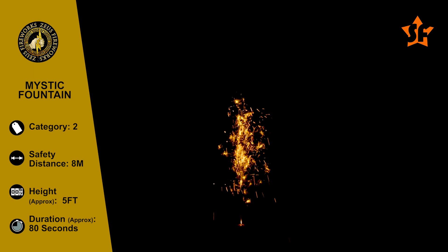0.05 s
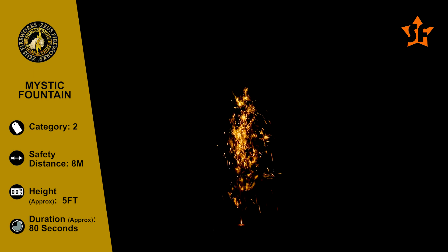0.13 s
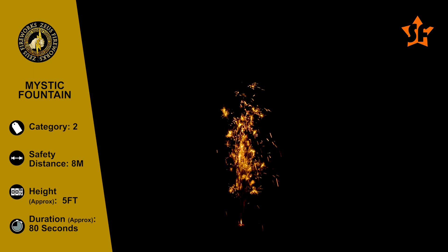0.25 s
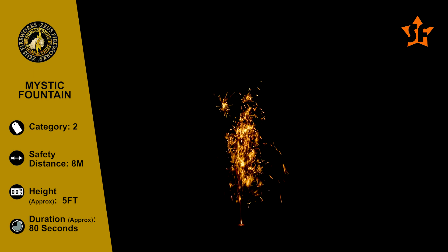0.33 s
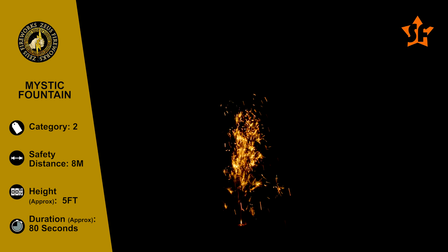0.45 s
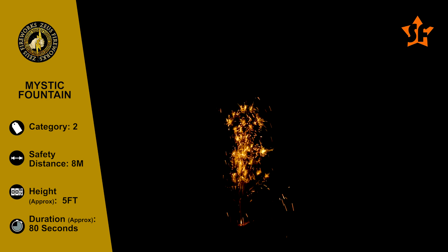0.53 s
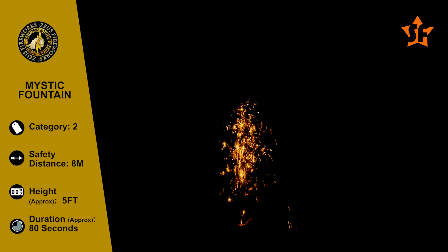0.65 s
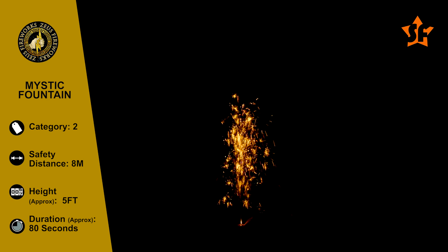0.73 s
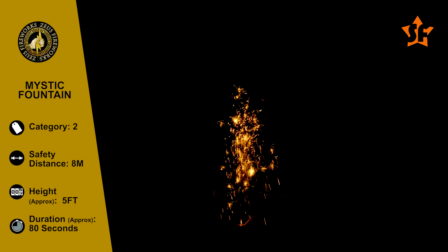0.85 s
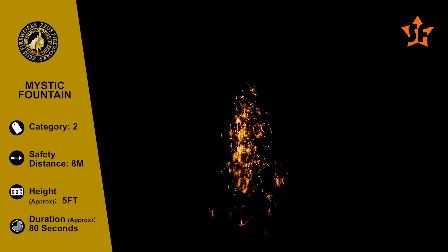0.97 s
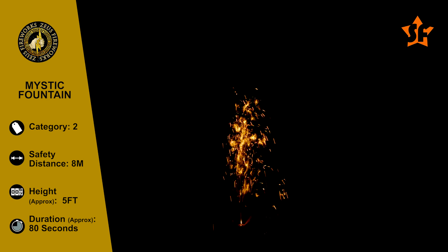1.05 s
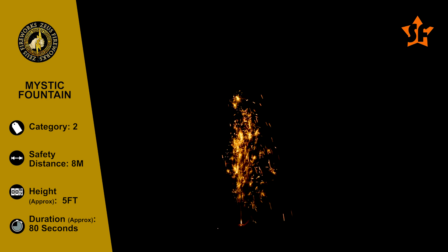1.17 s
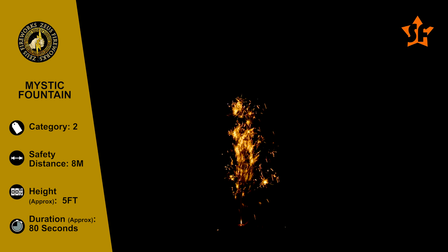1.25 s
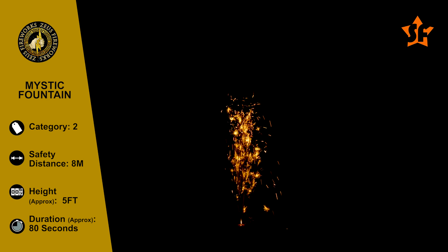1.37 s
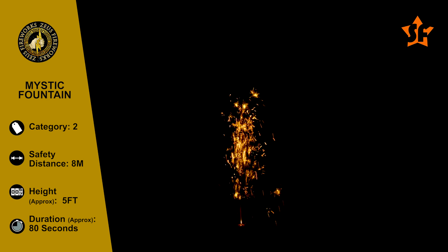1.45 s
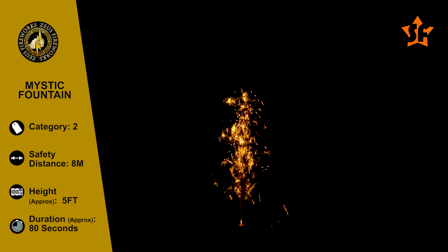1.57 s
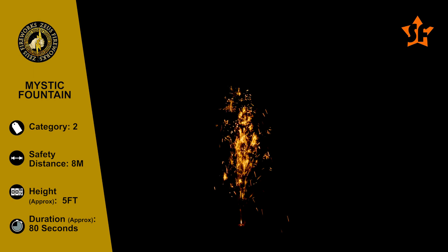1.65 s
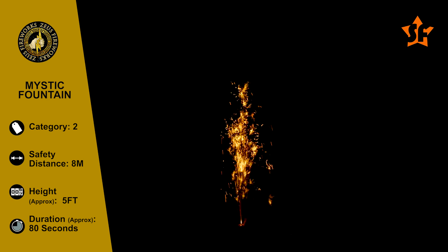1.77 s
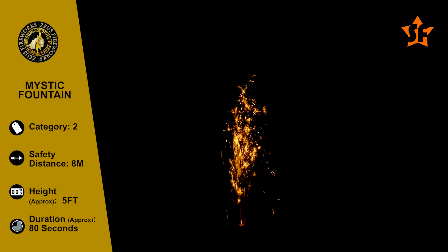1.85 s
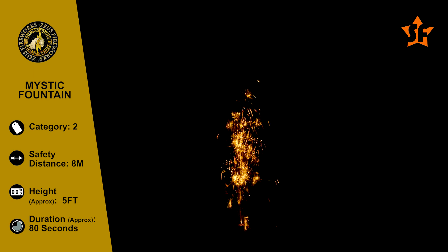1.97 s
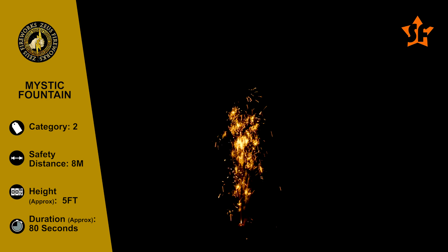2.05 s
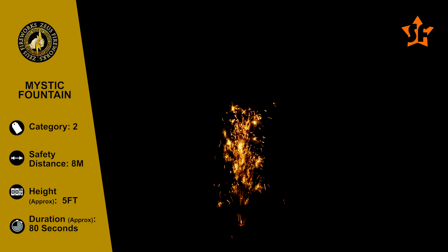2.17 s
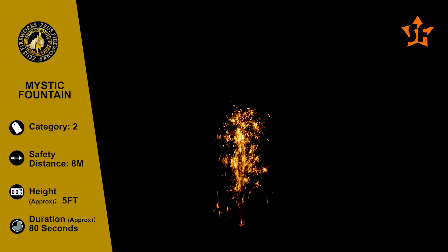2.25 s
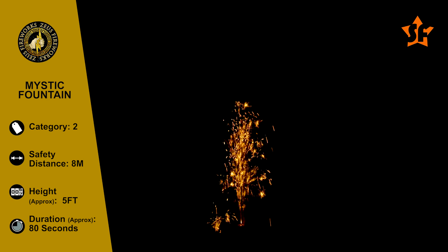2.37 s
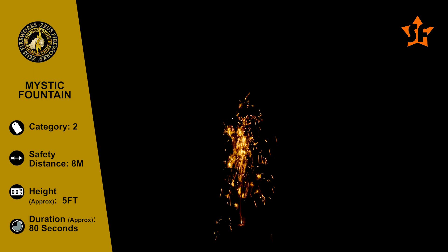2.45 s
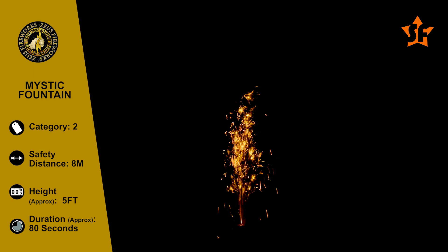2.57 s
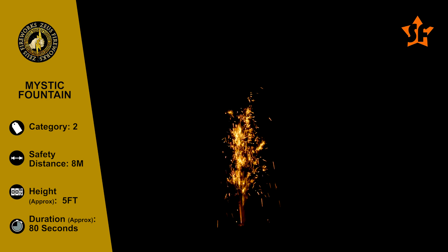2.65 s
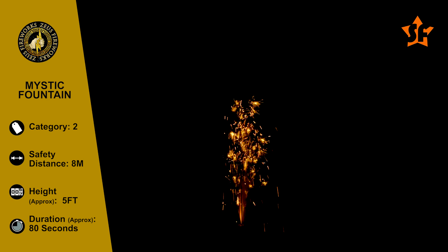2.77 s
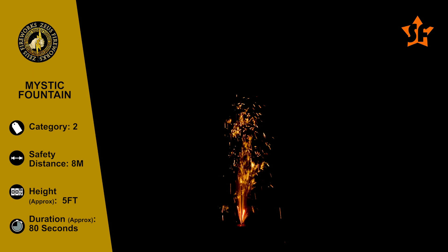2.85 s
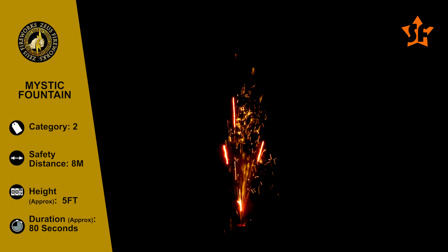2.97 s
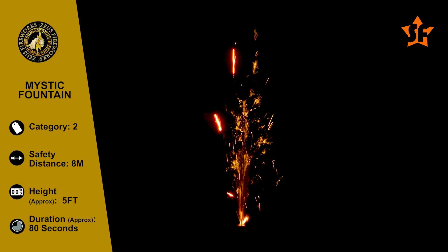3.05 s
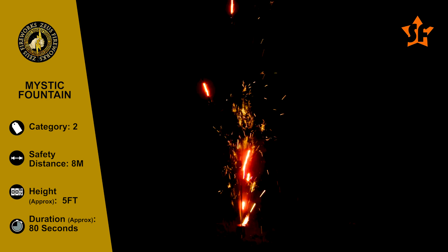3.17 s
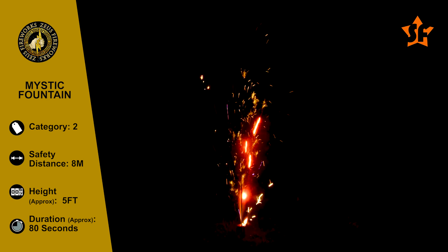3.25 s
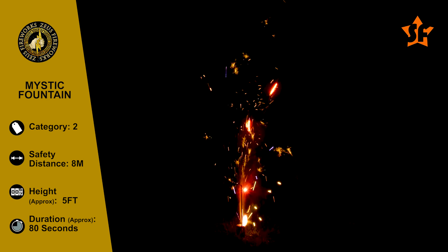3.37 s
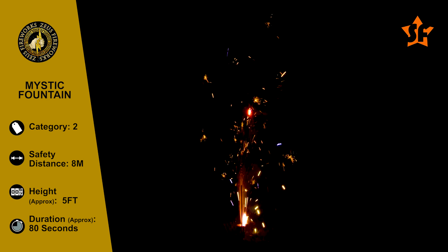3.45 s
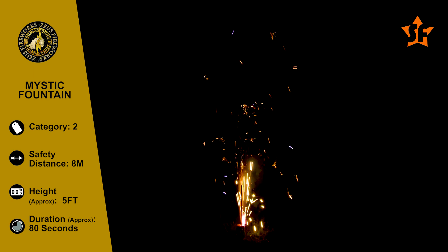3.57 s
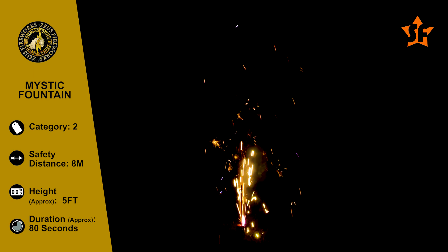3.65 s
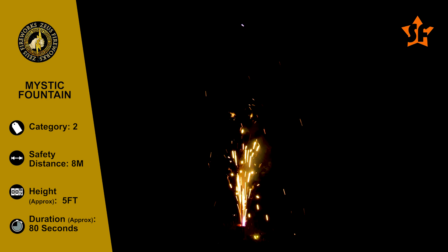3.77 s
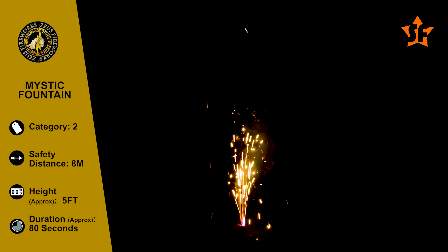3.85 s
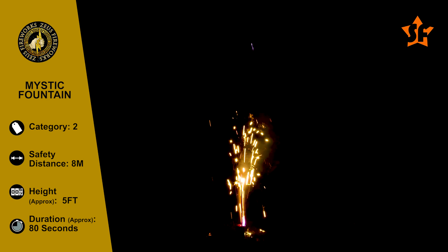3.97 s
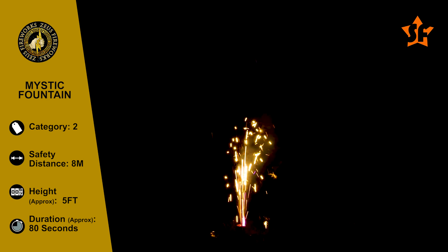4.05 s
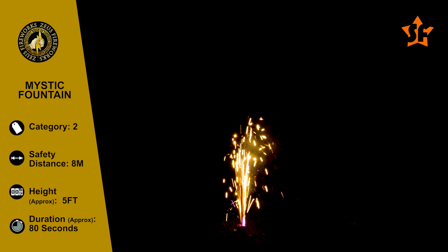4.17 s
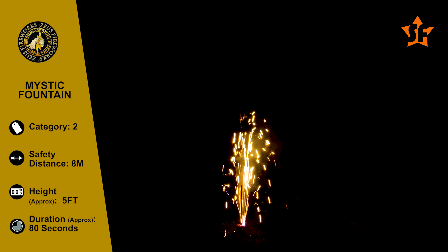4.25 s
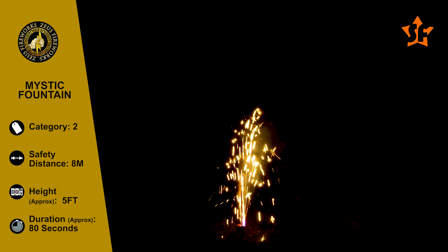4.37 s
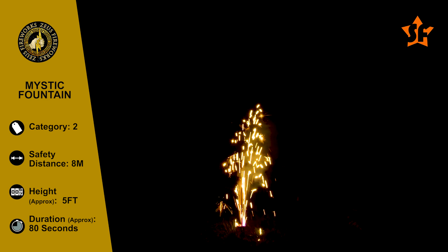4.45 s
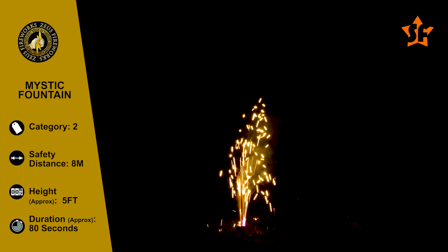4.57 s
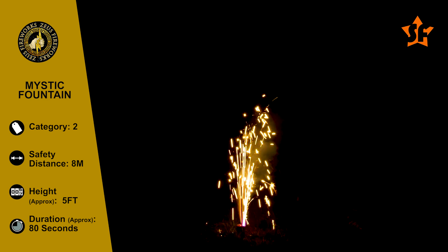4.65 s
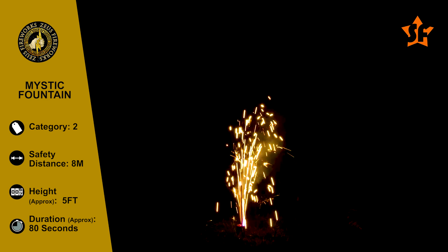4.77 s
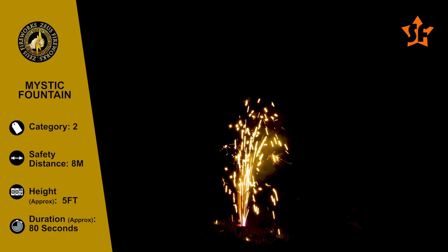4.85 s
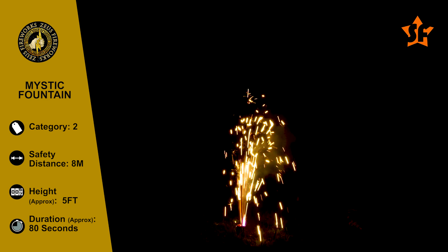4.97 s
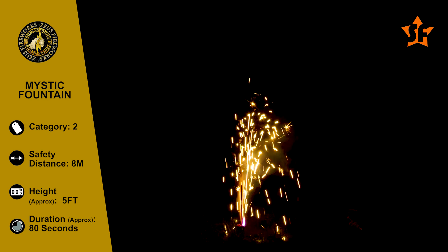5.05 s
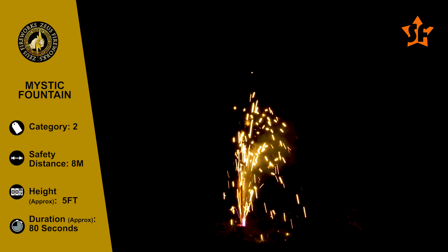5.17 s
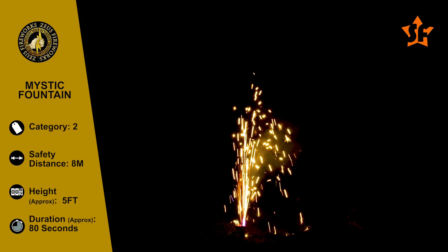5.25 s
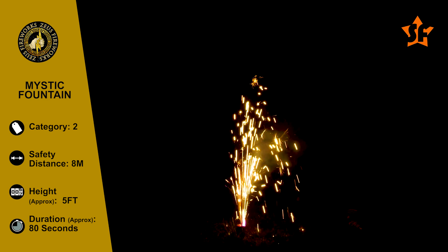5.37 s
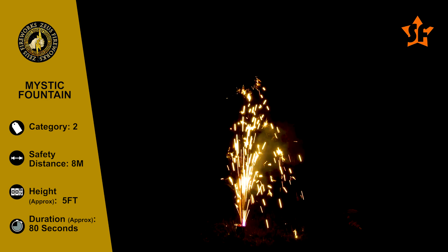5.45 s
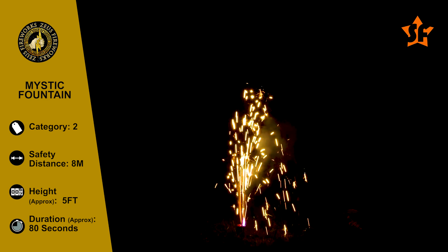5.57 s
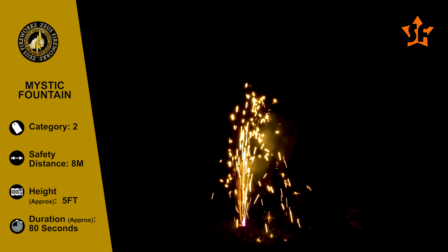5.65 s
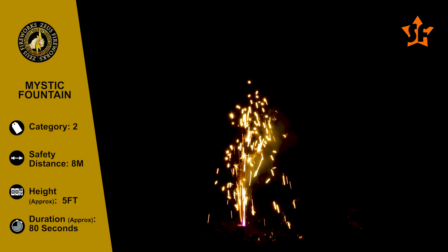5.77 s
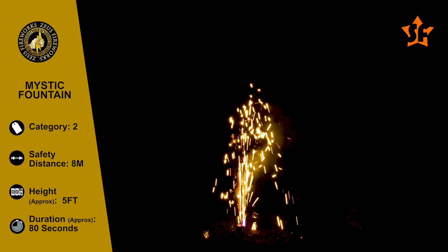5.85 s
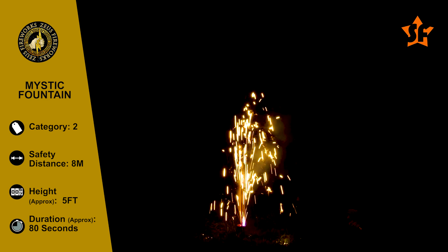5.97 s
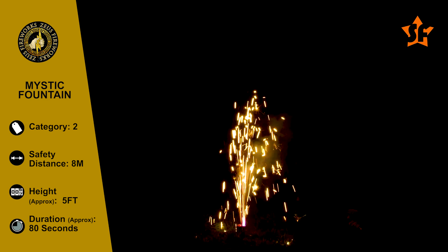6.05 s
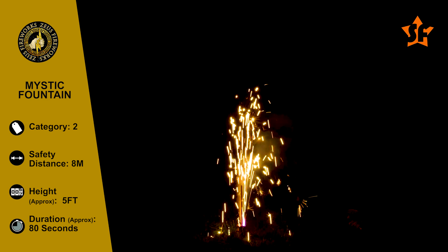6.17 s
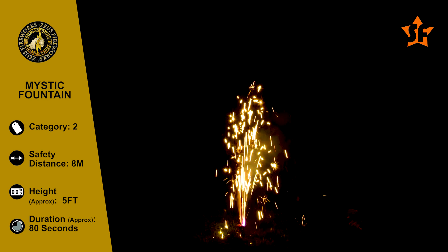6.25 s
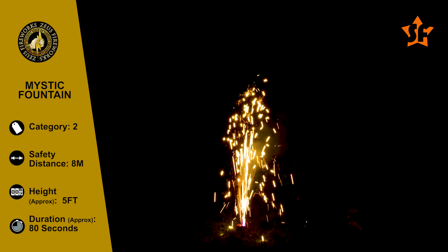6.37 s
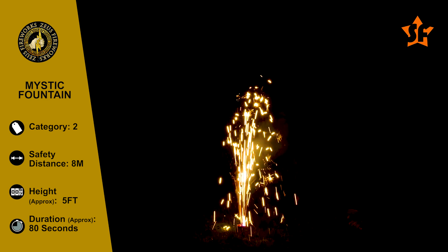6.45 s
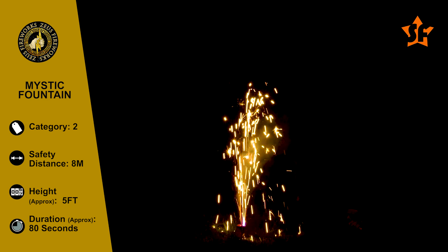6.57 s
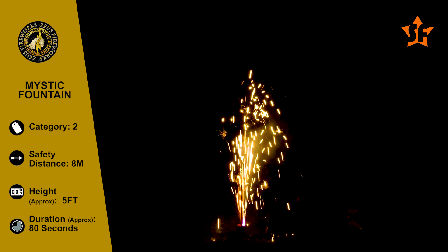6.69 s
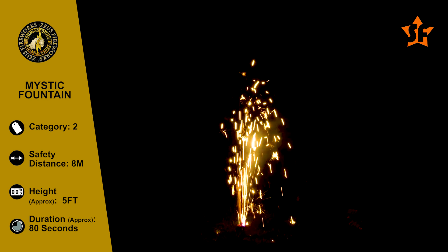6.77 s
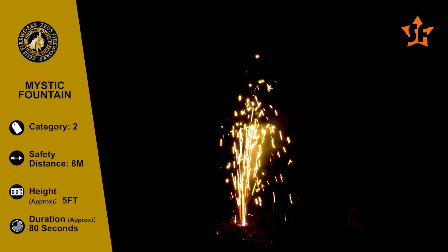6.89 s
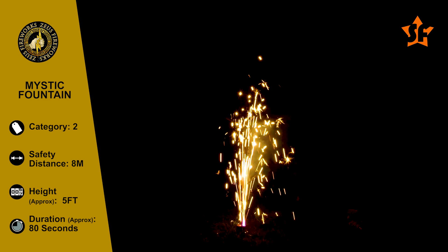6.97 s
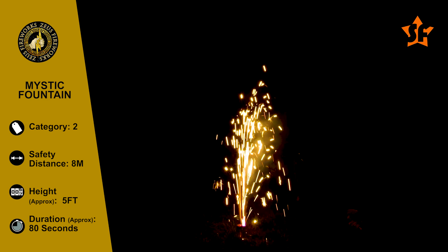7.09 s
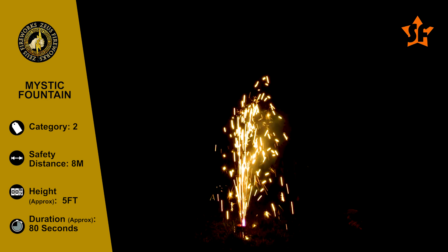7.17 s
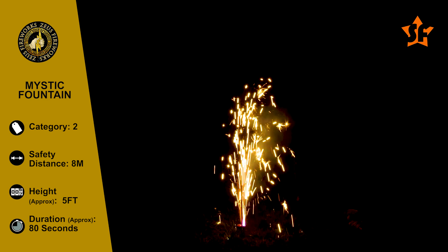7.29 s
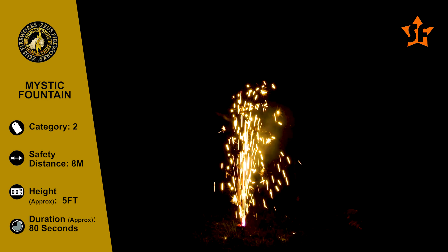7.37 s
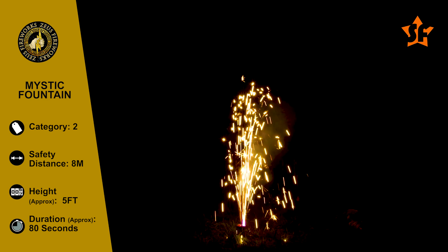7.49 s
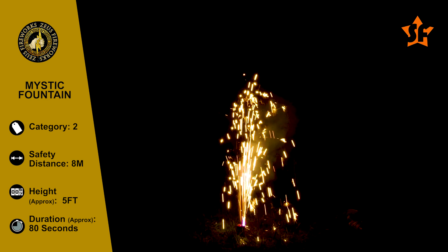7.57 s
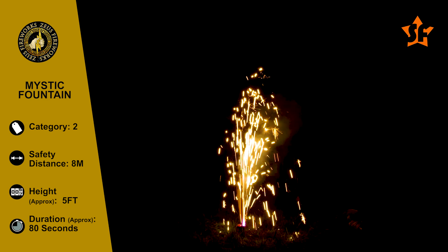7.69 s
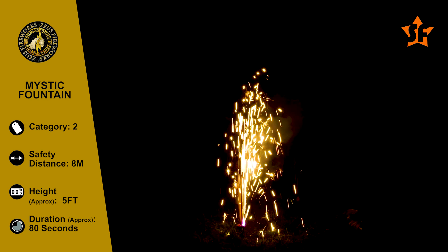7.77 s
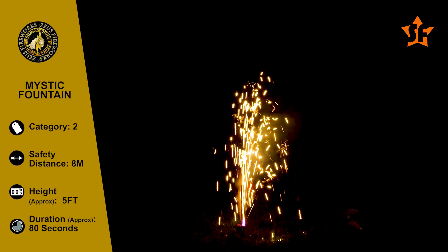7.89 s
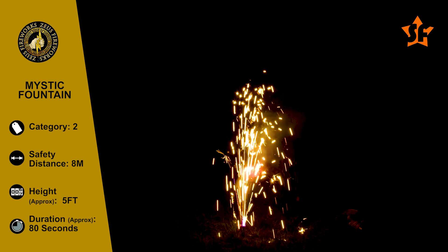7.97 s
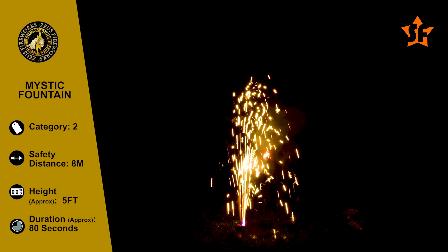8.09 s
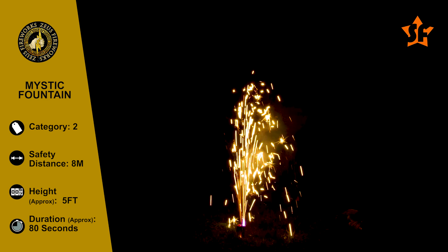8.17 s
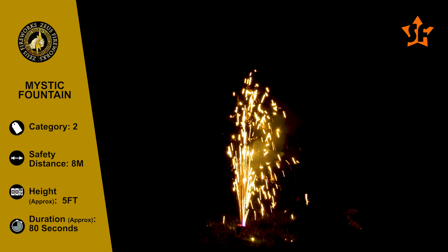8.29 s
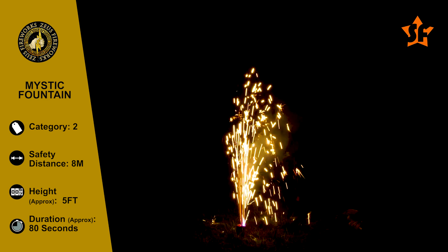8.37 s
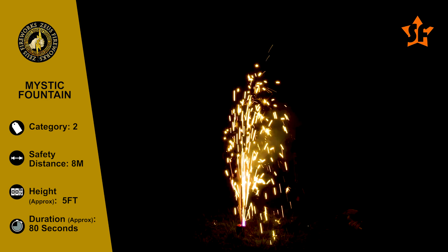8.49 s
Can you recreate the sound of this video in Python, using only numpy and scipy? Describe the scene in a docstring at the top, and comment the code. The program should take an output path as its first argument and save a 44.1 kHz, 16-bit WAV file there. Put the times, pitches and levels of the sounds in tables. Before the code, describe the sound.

Steady bright firework hiss with a breathy high whistle sinks into soft puffs, then a second charge builds, roaring and crackling ever more thickly.

```python
"""A firework fountain burns on the ground outdoors, heard on one microphone in light wind.
At first the jet hisses over a low roar and fine sizzle (coloured noise), with a breathy, wavering whistle.
Near 2.5 s the first charge burns out: the hiss sinks, flares and chokes, and soft puffs of air swing.
From 2.9 s the second charge takes over with a fuller roar, then a broad ring of the burning cavity.
Sparks snap ever more densely (tiny pressure shocks), and the whistle returns; gusts buffet the microphone."""
import sys
import numpy as np
from scipy import signal
from scipy.fft import rfft, irfft, next_fast_len
from scipy.io import wavfile

SR = 44100
rng = np.random.default_rng(int(sys.argv[2]) if len(sys.argv) > 2 else 0)


def ratio_of_db(decibels):
    """Turn decibels (scalar or array-like) into linear amplitude factors; 0 dB maps to 1."""
    return 10 ** (np.asarray(decibels, float) / 20)


def store_wav(level_fs):
    """Save 16-bit WAV to argv[1]."""
    pcm = np.round(np.clip(np.atleast_2d(level_fs), -1, 1) * 32767)
    wavfile.write(sys.argv[1], SR, pcm.T.astype(np.int16))


N = 376173


def rms_one(x):
    """Scales to unit power."""
    return x / np.sqrt(np.mean(x ** 2) + 1e-20)


def in_time(rows):
    """Turns the columns of a table into curves with one value a sample; the first column is time in s."""
    time_s, *columns = np.transpose(rows)
    return [np.interp(np.arange(N) / SR, time_s, column) for column in columns]


def swell(start_s, attack_s, hold_s, release_s):
    """Rises from 0 to 1, holds and falls back."""
    corners_s = np.cumsum([0, attack_s, hold_s, release_s])
    return np.interp(np.arange(N) / SR - start_s, corners_s, [0, 1, 1, 0])


def drift(rate_hz):
    """Slow chance: noise at every 40th sample through a double one-pole low-pass; spread 1."""
    pole = np.exp(-80 * np.pi * rate_hz / SR)
    noise = rng.standard_normal(N // 40 + 2002)
    slow = signal.lfilter([1], [1, -2 * pole, pole * pole], noise)[2000:]   # skip the filter's start
    return np.interp(np.arange(N) / 40, np.arange(len(slow)), rms_one(slow))


def turbulence(source, spectrum, heard_hz, surge_db, patchy_db, tilt_db, pivot_hz):
    """Colours a source to rms 1 inside heard_hz, then tilts overlapping bands and lets each flicker."""
    size = next_fast_len(N)
    hz = np.maximum(np.fft.rfftfreq(size, 1 / SR), 1)
    point_hz, point_db = np.transpose(spectrum)
    colour_db = np.interp(np.log(hz), np.log(point_hz), point_db, -99, -99)
    coloured = rfft(source, size) * ratio_of_db(colour_db)
    inside = (hz > heard_hz[0]) & (hz < heard_hz[1])
    coloured = coloured * size / np.sqrt(2 * np.sum(np.abs(coloured[inside]) ** 2))
    out, step = 0, .5   # bands half an octave apart
    for centre in np.arange(np.log2(point_hz[0]), np.log2(point_hz[-1]) + step, step):
        share = np.clip(1 - np.abs(np.log2(hz) - centre) / step, 0, 1)
        band = irfft(coloured * share, size)[:N]
        slope_db = tilt_db * (centre - np.log2(pivot_hz))
        out = out + ratio_of_db(surge_db + slope_db + patchy_db * drift(20.0)) * band
    return out


def wavering_tone(rows, pole_width_hz, wobble, tremble_hz, loose_hz, flicker_db):
    """Noise in a moving resonance: pitch wobbles slowly and trembles fast, more so above loose_hz."""
    hz, level_db = in_time(rows)
    pole = np.exp(-np.pi * pole_width_hz / SR)
    real, imag = signal.lfilter([1], [1, -2 * pole, pole * pole], rng.standard_normal((2, N)))
    tremble = (tremble_hz + .35 * np.maximum(hz - loose_hz, 0)) * drift(300)
    wobbling_hz = hz * (1 + wobble * drift(7.0))
    phase = 2 * np.pi * np.cumsum(wobbling_hz + tremble) / SR
    tone = rms_one(real * np.cos(phase) + imag * np.sin(phase))
    return ratio_of_db(level_db + flicker_db * drift(7.7)) * tone   # the level breaks into blobs


def jet():
    """Hiss, roar and sizzle share the flares and surges of the burning; each band also flickers alone."""
    # the burning jet before flares and flicker: time_s, hiss_db, spark_sizzle_db, flame_roar_db
    burning = [(0, -23.5, -37, -45), (.43, -22.5, -36, -44.5), (.8, -23.5, -39, -47),
               (.97, -22.5, -39, -43.5), (1.86, -24, -38.5, -47.5), (2.22, -23, -39, -44.5),
               (2.5, -24, -39, -43), (2.66, -27, -41, -41), (2.77, -34.5, -38.5, -41), (3.0, -37, -38, -47),
               (3.11, -37.5, -40.5, -42.5), (3.2, -38.5, -41.5, -37.5), (3.43, -34.5, -42, -40.5),
               (3.49, -31, -43, -39), (3.58, -28, -42.5, -36), (3.8, -26, -38, -37.5),
               (4.05, -26, -43.5, -40), (4.33, -25, -47, -38.5), (4.75, -24, -39.5, -40),
               (5.2, -22.5, -41.5, -38.5), (5.62, -24.5, -37, -40), (6.0, -23, -37.5, -39.5),
               (6.46, -23, -36, -38.5), (7.22, -25, -39, -43), (7.43, -23, -37.5, -38),
               (7.98, -24.5, -37, -41), (8.53, -22.5, -34.7, -40)]
    # the dying jet flares up or chokes for a moment: start_s, rise_db, hold_s
    flares = [(2.574, -3.5, 0.0047), (2.725, -3, .01), (2.864, 6.5, 0.043), (2.984, 2.5, .005),
              (3.063, 4, 0.027), (3.135, -1.5, .06), (3.326, 1.5, 0.018)]
    # how the treble of the sizzle leans: time_s, tilt (dB per octave)
    sizzle_tilt = [(0, -1), (2.6, -1), (3.1, 3), (3.2, -1.5), (4.2, -1.5), (6, -0.7), (8.53, -0.5)]
    # relative strength of each pitch in the noise: pitch_hz, level_db (per Hz)
    hiss_colour = [(330, -26.5), (560, -14.5), (700, -12), (1070, -6), (1260, -2), (1480, -5.5), (1800, 1),
                   (2050, 2), (2400, 0.5), (3300, -2.5), (5200, -5), (6300, -10), (7000, -20),
                   (8300, -16.5), (9000, -60)]
    roar_colour = [(53, -42), (90, -15), (160, -6), (215, -10), (282, -2), (350, -6.5), (410, -1),
                   (470, -4.5), (580, -17), (750, -13.5), (1000, -41)]
    # weighting of the noise for the sizzle: pitch_hz, level_db
    sizzle_colour = [(500, -0.5), (1000, -5), (4500, 7.5), (6000, 3), (8200, -1), (8600, 0), (10800, -1),
                     (11500, -3), (13700, -6), (15900, -7)]

    hiss_db, sizzle_db, roar_db = in_time(burning)
    flare_db = sum(db * swell(s, 0.011, hold_s, 0.033) for s, db, hold_s in flares)
    # the second charge catches at 2.9 s and has its own tilt at full blast (dB per octave)
    charge_tilt_db = np.where(np.arange(N) / SR < 2.9, 1.12, -0.1)
    # a hiss weaker than -23 dB is duller, down to a lowest tilt of -5 dB per octave
    tilt_db = np.maximum(charge_tilt_db + 0.75 * np.minimum(hiss_db + 23, 0), -5)
    surge = 0.3 * drift(1.6) + .5 * drift(25.0)
    white = rng.standard_normal((3, N))
    # the burning grains make the hiss a little gritty
    grit = white[0] * ratio_of_db(1.94 * np.minimum(rng.exponential(1, N), 6))
    hiss = turbulence(grit, hiss_colour, (1200, 6300), 0.71 * surge, 0.34, tilt_db, pivot_hz=2500)
    roar_surge_db = 2.7 * surge + 0.58 * drift(38.0)
    roar = turbulence(white[1], roar_colour, (220, 520), roar_surge_db, 1.0, tilt_db=-0.9, pivot_hz=350)
    sizzle_tilt_db = in_time(sizzle_tilt)[0]
    sizzle = turbulence(white[2], sizzle_colour, (8500, 15500), 1.8 * surge, 0.53,
                        sizzle_tilt_db, pivot_hz=10500)
    # a flare moves the roar more than the hiss, and the sizzle less
    return (ratio_of_db(hiss_db + flare_db) * hiss
            + ratio_of_db(roar_db + 1.75 * flare_db) * roar
            + ratio_of_db(sizzle_db + 0.84 * flare_db) * sizzle)


def whistle():
    """Gas at the nozzle lip whistles breathily: noise in a narrow resonance that glides."""
    # path of the whistle before it wavers: time_s, pitch_hz, level_db
    whistle_path = [(0, 7285, -40), (.3, 7650, -39.5), (1.4, 7300, -41), (1.7, 7000, -37),
                    (1.9, 6500, -35.5), (2.1, 5950, -37), (2.3, 6100, -37), (2.43, 5700, -41),
                    (2.7, 6034, -65), (4.4, 5800, -55), (4.7, 5800, -42), (5.4, 5950, -40),
                    (5.6, 5500, -35), (5.75, 5120, -33), (5.9, 5850, -37), (6.3, 5980, -35.5),
                    (6.62, 5045, -35), (6.93, 6110, -33.5), (7.18, 5780, -33), (7.45, 5730, -31.5),
                    (7.68, 6006, -36), (7.83, 5400, -37), (8.0, 5630, -44), (8.3, 6150, -35),
                    (8.53, 6100, -40)]
    return wavering_tone(whistle_path, pole_width_hz=260, wobble=.01, tremble_hz=140,
                         loose_hz=6700, flicker_db=1.5)


def sparks():
    """Each burst is a small shock: a needle of pressure, then a longer swing the other way that fades."""
    # the loudest and loneliest bursts: time_s, strength_db (before the shock's shape and the bass cut)
    snaps = [(2.8899, -8), (3.7903, -10), (3.8959, -9), (3.9244, -12), (3.9463, -12), (3.9507, -12),
             (4.1024, -13), (4.2532, -11), (4.2593, -7), (4.322, -11), (4.3885, -9), (4.4719, -9),
             (4.4878, -12), (4.5414, -9), (4.5844, -6), (4.6199, -9), (4.6992, -6), (5.0006, -8),
             (5.0307, -7), (5.0502, -6), (5.1105, -8), (5.228, -5), (5.3175, -8), (5.5405, -8),
             (5.6046, -5), (5.631, -7), (5.7163, -6), (5.7641, -6), (5.8095, -5), (5.9969, -6),
             (6.3317, -6), (6.3346, -7), (6.3444, -5), (6.4077, -7), (6.5826, -6), (6.6811, -5),
             (6.8605, -7), (7.085, -5), (7.2158, -7), (7.2799, -7), (7.3193, -5), (7.3577, -5),
             (7.3612, -6), (7.582, -7), (7.6088, -7), (7.6584, -7), (7.7154, -6), (7.7305, -4),
             (7.7599, -6), (7.7639, -6), (7.8336, -7), (7.9186, -7), (8.0597, -7), (8.0703, -7),
             (8.0939, -9), (8.0953, -9), (8.1747, -7), (8.2651, -7), (8.2949, -6), (8.3621, -6),
             (8.4949, -6), (8.519, -7)]
    # smaller bursts come at random: time_s, average rate (bursts per s)
    crackle = [(0, 2), (3.5, 2), (4, 35), (5, 60), (8.53, 110)]
    needle_s, swing_s, fade_s = .000035, .000113, .00009
    t = np.arange(-2, 60) / SR
    needle = -np.clip(1 - np.abs(t) / needle_s, 0, 1)
    swing_rise = np.clip((t - needle_s / 2) / (swing_s - needle_s / 2), 0, 1)
    swing = swing_rise * np.exp(-np.maximum(t - swing_s, 0) / fade_s)
    shock = 1.2 * (needle + .8 * swing)   # the tip stands higher than what survives the top cut
    settle = signal.windows.hann(len(t))
    shock = shock - shock.sum() * settle / settle.sum()   # the pressure returns to rest

    born = rng.random(N) < in_time(crackle)[0] / SR
    # smallest burst, spread above it, largest burst
    burst_db = np.minimum(-24.5 + 8.5 * rng.exponential(1, N), -8.5)
    clicks = born * ratio_of_db(burst_db)
    for s, db in snaps:
        clicks[round(s * SR)] = ratio_of_db(db)
    bursts = np.convolve(clicks, shock)[2:N + 2] + 1e-18
    # the bursts are too small to carry bass
    return signal.lfilter(*signal.butter(2, 700, "high", fs=SR), bursts)


def wind():
    """Lumpy low pressure swirls on the microphone: gusts over a wavering breeze, each with its own tilt."""
    # gusts, timed halfway up and down their edges: start_s, length_s, level_db, tilt (dB per octave)
    gusts = [(0.888, 0.182, -35, 2), (1.096, .17, -34.5, 0.5), (1.63, 0.18, -39.5, 0.5),
             (2.096, 0.27, -41, -5.5), (2.55, 0.19, -51, 6), (2.77, 0.2, -45, 4.5), (3.065, .33, -44.5, 7),
             (3.47, .15, -45, 9.5), (4.005, .05, -45, 4), (4.56, .09, -45, 9), (4.962, 0.096, -31.5, 0.5),
             (5.28, .1, -49, -3), (5.64, .2, -44, -8), (6.062, 0.206, -38.5, -6), (6.499, .1, -50, 10),
             (7.172, .06, -46, 6), (7.567, .07, -48, -1), (8.46, .1, -42, 0)]
    # relative strength of each pitch in the noise: pitch_hz, level_db (per Hz)
    wind_colour = [(15, -34), (30, -3), (45, -0.5), (65, 2), (120, -3.5), (200, -12), (400, -35)]
    edge_s, breeze_db = 0.051, -51
    level_db = breeze_db + 1.5 * drift(4.0)
    tilt_db = 0
    for start_s, length_s, gust_db, gust_tilt_db in gusts:
        shape = swell(start_s - edge_s / 2, edge_s, max(length_s - edge_s, 0), edge_s)
        level_db = level_db + shape * (gust_db - breeze_db)
        tilt_db = tilt_db + shape * gust_tilt_db
    lumps = rng.standard_normal(N) * ratio_of_db(2.1 * drift(18.0))
    return ratio_of_db(level_db) * turbulence(lumps, wind_colour, (25, 130), 0, 0.94, tilt_db, pivot_hz=70)


def puffs():
    """Each gulp of gas from the nozzle is a soft push of air that swings for a cycle or two."""
    # gulps, mostly while the jet sputters: start_s, peak_db, pitch_hz
    gulps = [(2.547, -27.5, 277), (2.592, -36, 159), (2.669, -32, 128), (2.78, -30, 121), (2.877, -27, 128),
             (3.084, -30, 286), (3.129, -33, 129), (3.169, -27, 145), (3.213, -30, 118), (3.314, -31, 283),
             (3.368, -23, 292), (3.484, -27, 144), (3.551, -29, 175), (3.636, -23, 277), (3.741, -24, 167),
             (8.085, -18.5, 517)]
    peak_s, cycles = 0.00723 + .005, 1.4   # time from start to peak
    out, t = np.zeros(N), np.arange(N) / SR
    for s, db, hz in gulps:
        span = slice(round(s * SR), round((s + .1) * SR))
        from_peak_s = t[span] - s - peak_s
        push = np.exp(-.5 * (from_peak_s * hz / cycles * 2) ** 2)
        out[span] += ratio_of_db(db) * push * np.cos(2 * np.pi * hz * from_peak_s)
    return out


def cavity():
    """The burning cavity rings broadly, rising as the second charge opens up: noise in a wide resonance."""
    # path of the ring before it wavers: time_s, pitch_hz, level_db
    ring_path = [(3.5, 2000, -55), (3.8, 2110, -42), (4.2, 2400, -32), (5.0, 2694, -30), (5.35, 3200, -27),
                 (5.9, 2700, -31), (7.5, 2750, -33), (8.53, 2780, -35)]
    return wavering_tone(ring_path, pole_width_hz=660, wobble=.03, tremble_hz=369.4,
                         loose_hz=3300, flicker_db=2.0)


def outdoors(x):
    """A few clear reflections and a thin scatter of weaker ones comb the spectrum finely."""
    # reflections off the ground and nearby things: delay_ms, strength (ratio, negative = inverted)
    echoes = [(1.162, -.04), (2.075, .04), (3.962, .055), (4.025, -.06), (4.382, -.035), (4.518, .035),
              (4.81, .035), (5.065, -.035)]
    # narrow rings and hollows where reflections add up or cancel: pitch_hz, width_hz, level_db
    rings = [(5810, 130, 2.2), (6220, 130, 2.2), (5660, 80, -2), (6990, 110, -3.5), (7470, 80, -2.5),
             (8450, 100, -2)]
    t = np.arange(1200) / SR
    scatter = ratio_of_db(-33) * rng.standard_normal(len(t)) * np.exp(-t / 0.011)
    paths = scatter * (t > .002) * (rng.random(len(t)) < .25)
    paths[0] = 1   # the direct sound
    for ms, strength in echoes:
        paths = paths + strength * np.sinc(np.arange(len(t)) - ms * SR / 1000)
    for hz, width_hz, db in rings:
        ring = signal.lfilter(*signal.iirpeak(hz, hz / width_hz, SR), paths)
        paths = paths + (ratio_of_db(db) - 1) * ring
    return signal.fftconvolve(x, paths)[:N]


def scene():
    """One microphone feeds both channels; only the fountain's steady sounds and puffs get reflections."""
    fountain = jet() + whistle() + puffs() + cavity()
    sound = outdoors(fountain) + sparks() + wind()
    return np.array([sound, sound])


def top_cut(x):
    """Nothing passes above the cut-off."""
    return signal.sosfilt(signal.butter(12, 16890, fs=SR, output="sos"), x)


def record(dry):
    """The top is cut steeply at 15745 Hz without smearing the snaps."""
    low_pass = signal.firwin(1025, 15745, window=("kaiser", 8), fs=SR)
    mix = signal.fftconvolve(dry, [low_pass], "same", axes=1)
    return top_cut(mix)


dry = scene()
out = record(dry)
store_wav(out)
```